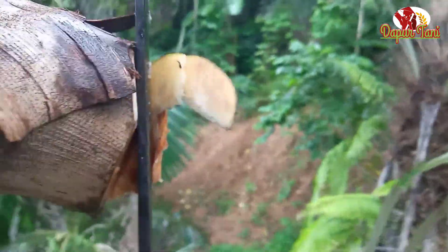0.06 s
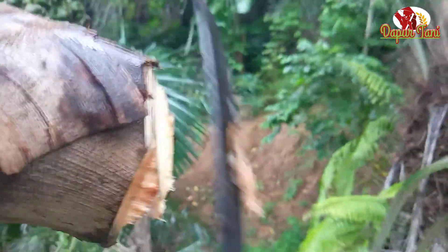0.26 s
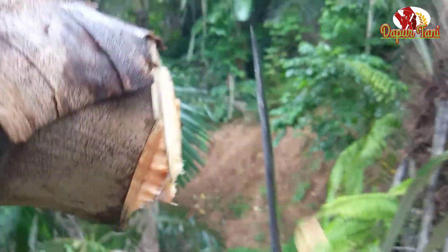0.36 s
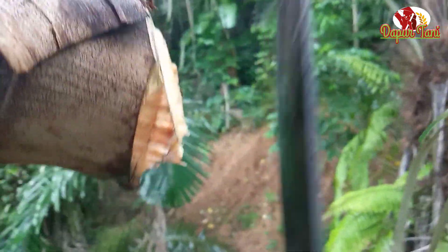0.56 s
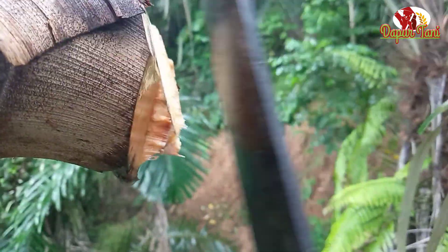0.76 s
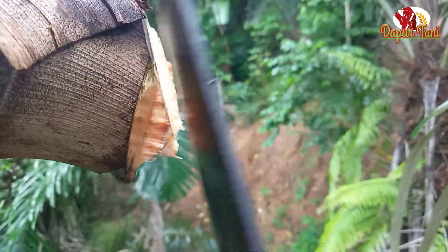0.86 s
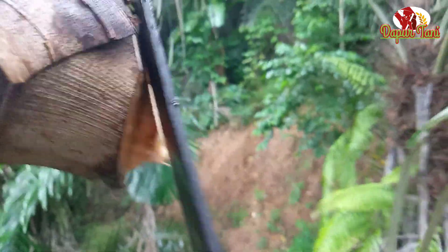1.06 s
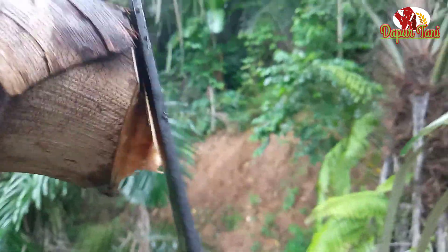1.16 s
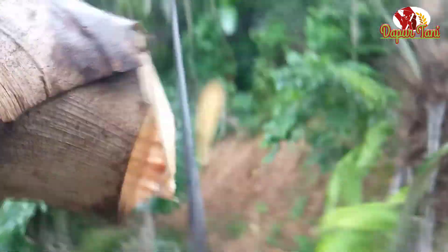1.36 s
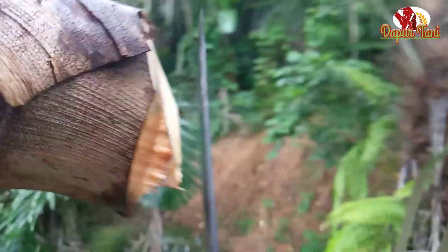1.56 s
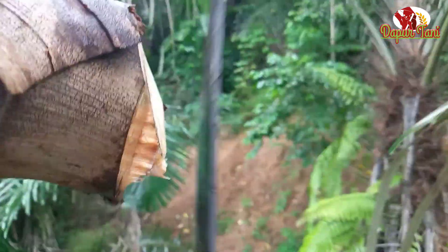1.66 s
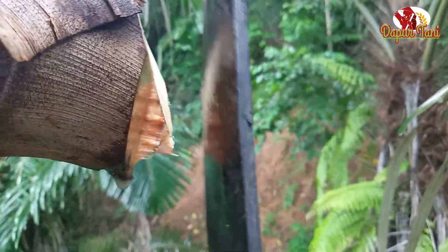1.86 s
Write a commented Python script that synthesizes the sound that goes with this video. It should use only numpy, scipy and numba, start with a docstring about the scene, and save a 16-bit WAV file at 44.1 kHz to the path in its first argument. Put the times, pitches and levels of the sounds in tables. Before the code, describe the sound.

A machete chops a thick fibrous stalk: a quick double crunch with a dull woody knock, sparse fibre ticks, then a rapid burst of wet tearing cuts and a final light tap, close up in quiet forest.

```python
"""A machete pares shavings off the cut end of a palm stalk, over steady forest rush, low drone and leaf ticks.
After one faint fibre tick, two short strokes crunch at 0.23 s and the stalk knocks; sparse ticks follow.
From 1.03 s seven strokes tear wet fibres, the stalk knocks again early on, and the steel rings faintly.
At 1.59 s the blade touches lightly. Noisy click trains drive the modes; filtered noise makes the forest."""
import sys
import numpy as np
from scipy import signal
from scipy.fft import rfft, irfft
from scipy.io import wavfile
from scipy.ndimage import uniform_filter1d
from numba import njit

SR = 44100
rng = np.random.default_rng(int(sys.argv[2]) if len(sys.argv) > 2 else 0)


def store_wav(level_fs):
    """Save 16-bit WAV to argv[1]."""
    pcm = np.round(np.clip(np.atleast_2d(level_fs), -1, 1) * 32767)
    wavfile.write(sys.argv[1], SR, pcm.T.astype(np.int16))


N = 83790


def undb(db):
    """Decibels to amplitude gain."""
    return 10 ** (np.asarray(db) / 20)


def unit(x):
    """Scale to standard deviation 1."""
    return x / (np.std(x) + 1e-12)


def clock():
    """Time of every sample, s."""
    return np.arange(N) / SR


def walk(rate_hz):
    """Random wander of spread 1: noise smoothed twice by a moving mean."""
    size = max(int(SR / rate_hz), 1)
    smooth = uniform_filter1d(rng.standard_normal(N), size)
    return unit(uniform_filter1d(smooth, size))


def through(x, response):
    """Convolve a force with an impulse response."""
    return signal.fftconvolve(x, response)[:N]


def highpass(x, cut_hz):
    """Second-order Butterworth high-pass."""
    return signal.sosfilt(signal.butter(2, cut_hz, "high", fs=SR, output="sos"), x)


def colour(points):
    """Minimum-phase impulse response of unit energy with spectrum (f/Hz, level/dB)."""
    hz, db = np.array(points, float).T
    size = 8192
    grid_hz = np.maximum(np.arange(size // 2 + 1) * SR / size, 1)
    gain = undb(np.interp(np.log(grid_hz), np.log(hz), db))
    cepstrum = irfft(np.log(gain))
    # fold the cepstrum to make the response causal
    cepstrum[1:size // 2] *= 2
    cepstrum[size // 2 + 1:] = 0
    response = irfft(np.exp(rfft(cepstrum)))
    return response / np.linalg.norm(response)


def ring(modes, wave=np.sin):
    """Impulse response: sum of exponentially decaying modes (f/Hz, t60/s, level/dB)."""
    t = clock()[:N // 2]
    response = np.zeros(len(t))
    for hz, t60_s, db in modes:
        decay = np.exp(-np.log(1000) * t / t60_s)
        response += undb(db) * wave(2 * np.pi * hz * t) * decay
    return response


def resonate(x, modes, wave=np.sin):
    """Drive modes whose joint response has unit energy."""
    response = ring(modes, wave)
    return through(x, response / np.linalg.norm(response))


def push(start_s, length_s):
    """Contact force: a half-sine of unit area."""
    phase = np.clip((clock() - start_s) / max(length_s, 4 / SR), 0, 1)
    force = np.sin(np.pi * phase)
    return force / force.sum()


@njit
def sweep(x, hz, q):
    """State-variable band-pass with a moving centre, gain 1 there."""
    y, band, low = np.empty(len(x)), 0., 0.
    for i in range(len(x)):
        g = np.tan(np.pi * hz[i] / SR)
        v = (band + g * (x[i] + 1e-18 - low)) / (1 + g * (g + 1 / q))
        band, low, y[i] = 2 * v - band, low + 2 * g * v, v / q
    return y


FIBRE_JITTER_LOG, FIBRE_SCATTER_DB = .26, 3.5


def fibres(rate_hz):
    """One click per fibre the edge crosses, uneven in spacing and strength."""
    chance = rng.standard_normal((N // 8, 2))
    places = np.cumsum(np.exp(FIBRE_JITTER_LOG * chance[:, 0]))
    at = np.interp(places, np.cumsum(rate_hz) / SR, np.arange(N)).astype(int)
    clicks = np.bincount(at, undb(FIBRE_SCATTER_DB * chance[:, 1]), N)
    clicks[-1] = 0  # surplus fibres pile up here
    clicks = clicks / np.sqrt(rate_hz)  # equal power at any rate
    return unit(highpass(clicks, 100))


# strokes of the edge: t/s, length/s, level/dB, swell over the stroke/dB, chatter f/Hz at start,
# chatter f/Hz at end, sizzle level/dB, steel level/dB (both re crunch)
STROKES = [(0.2343, 0.015, -29.5, 5, 2305, 3170, -26, -29),
           (0.2564, .0170, -36, 17, 1400, 1700, -23.5, -44),
           (1.031, 0.036, -32, 2.5, 1450, 1650, -16.5, -21.5),
           (1.0685, 0.0071, -22, -7, 1493, 2500, -23, -30),
           (1.2007, 0.037, -26, -2.5, 1501, 1350, -28.5, -43),
           (1.259, 0.022, -24, 7.5, 1656, 884, -27.5, -36), (1.2824, .0160, -30, -5, 900, 1500, -24.5, -42),
           (1.3250, 0.027, -23, 5, 2297, 1050, -26, -38), (1.3502, 0.02, -18.5, 5, 1080, 2790, -25.5, -36)]
STROKE_ATTACK_S, STROKE_RELEASE_S = 0.0032, 0.0035
GRIP_DB, GRIP_HZ = 1.5, 240  # spread and smoothing rate of the effort
SHAVING_DB, SHAVING_Q = 2, 1.57


def strokes():
    """The edge chatters over fibres; the shaving resonates at the chatter rate."""
    t = clock()
    tear, sizzle_drive, steel_drive, drag = np.zeros((4, N))
    for start_s, length_s, db, swell_db, first_hz, last_hz, sizzle_db, steel_db in STROKES:
        along = np.clip((t - start_s) / length_s, 0, 1)
        attack = np.clip((t - start_s) / STROKE_ATTACK_S, 0, 1)
        release = np.exp(-np.maximum(t - start_s - length_s, 0) / STROKE_RELEASE_S)
        effort_db = db + swell_db * (along - .5) + GRIP_DB * walk(GRIP_HZ)
        effort = attack * release * undb(effort_db)
        chatter_hz = first_hz * (last_hz / first_hz) ** along
        crunch = effort * fibres(chatter_hz)
        shaving = undb(SHAVING_DB) * sweep(crunch, chatter_hz, SHAVING_Q)
        tear += (crunch + shaving) / np.sqrt(2)
        sizzle_drive += undb(sizzle_db) * crunch
        steel_drive += undb(steel_db) * crunch
        drag += effort
    return tear, sizzle_drive, steel_drive, drag


# single fibres snapping: t/s, level/dB, sizzle level/dB (re snap)
SNAPS = [(.1025, -37, -13), (0.2465, -15, -20.5), (0.2705, -16.5, -38), (0.754, -32, -29),
         (.8060, -22.5, -36), (0.9409, -29, -24), (0.956, -28, -40), (1.028, -33.5, -16), (1.0354, -33, -5),
         (1.0400, -20, -8.5), (1.0460, -24, -10), (1.0520, -18, -26), (1.0757, -12, -24),
         (1.2154, -19.5, -34), (1.2726, -19.5, -35), (1.2807, -16.5, -34), (1.336, -18, -34),
         (1.3675, -14, -15.5), (1.5918, -24, -28)]
SNAP_DECAY_S = 0.0014


def snaps():
    """Each snapping fibre is a noise burst with exponential decay."""
    t = clock()
    tear, sizzle_drive = np.zeros((2, N))
    for start_s, db, sizzle_db in SNAPS:
        decay = (t >= start_s) * np.exp(-np.abs(t - start_s) / SNAP_DECAY_S)
        burst = undb(db) * decay * rng.standard_normal(N)
        tear += burst
        sizzle_drive += undb(sizzle_db) * burst
    return tear, sizzle_drive


# spectrum the tearing fibres sound through: f/Hz, level/dB
PULP = [(60, -33), (130, 1.5), (300, 5), (640, 5), (900, -2.5), (1250, -3.5), (2100, -1), (2800, -6.5),
        (3600, -7.5), (4400, -22), (5500, -47), (9000, -34.5), (16000, -85)]
# resonances of the pulp: f/Hz, t60/s, level/dB
PULP_MODES = [(645, 0.12, -2), (844, 0.088, -0.5), (1152.4, 0.061, 10), (1266, 0.041, 7.5),
              (1347, .06, -16), (1482, 0.071, -0.5), (1582, 0.21, -15), (1920, 0.18, -22),
              (2065, 0.043, 1.5), (2470, 0.099, -25), (3080, 0.057, -1.5)]
PULP_DB, PULP_RING_DB = -2, -13.5  # overall; resonances re direct tear


def pulp(tear):
    """Wet pulp rings with the tear and colours it."""
    ringing = undb(PULP_RING_DB) * resonate(tear, PULP_MODES, np.cos)
    return undb(PULP_DB) * through(tear + ringing, colour(PULP))


# spectrum of the wet sizzle at the edge: f/Hz, level/dB
SIZZLE = [(1500, -18), (4000, 1), (5000, 2), (5700, -4), (6800, -2), (8500, 1), (10000, -6), (11300, -9),
          (12400, -19), (14000, -13), (15300, -8)]


def sizzle(drive):
    """Wet sizzle: crunch and snaps through a treble spectrum."""
    return through(drive, colour(SIZZLE))


# modes of the blade: f/Hz, t60/s, level/dB
STEEL = [(4900, .07, -11), (6380, 0.074, 3), (8400, .08, 3), (9610, 0.053, -2), (14340, .05, -14)]


def steel(drive):
    """The crunch excites the decaying modes of the blade."""
    return resonate(drive, STEEL)


# shudder spectrum of the stalk: f/Hz, level/dB
SHAKE = [(25, -16), (55, -15), (85, 1), (150, 0.5), (400, -4.5), (900, -51)]
SHAKE_DB = -30
SWAY_HZ, SWAY_T60_S, SWAY_DB = 56, .3, -39


def shudder(drag):
    """The dragging edge shakes the stalk with noise; its lowest mode sways on."""
    judder = drag / drag.max() * rng.standard_normal(N)
    shake = undb(SHAKE_DB) * through(judder, colour(SHAKE))
    sway = undb(SWAY_DB) * resonate(judder, [(SWAY_HZ, SWAY_T60_S, 0)])
    return shake + sway


def cutting():
    """Strokes and snaps drive pulp and sizzle; strokes also drive steel and stalk."""
    tear, sizzle_drive, steel_drive, drag = strokes()
    snap_tear, snap_sizzle = snaps()
    edge = pulp(tear + snap_tear) + sizzle(sizzle_drive + snap_sizzle)
    return edge + steel(steel_drive) + shudder(drag)


# knocks: t/s, level/dB, contact/s, place (0 = rim, 1 = cut face), damping by the resting blade/(dB/s)
KNOCKS = [(0.2467, -13.5, 0.0022, 0, 1100), (0.269, -2, 0.001, 0.072, 13),
          (.9400, -21.5, 0.00069, 0.83, 505), (1.0780, -3.5, .0012, 0.93, 332),
          (1.0974, -18.5, 0.0018, 1, 900)]
# modes of the stalk: f/Hz, t60/s, level/dB struck at the rim, level/dB struck on the face
STALK = [(57.7, 0.58, -26, -37), (147.4, 0.096, -8.5, -21), (211, 0.036, -16, 1), (332, 0.055, -5.5, -9.5),
         (448, 0.066, -15, -11.5), (625, 0.066, -51, -6)]
DISPERSION_HZ = 440  # below this the jolt travels slowly along the stalk


def knocks():
    """The blade jolts the stalk; place sets the mode mix, the resting blade damps it."""
    t = clock()[:N // 2]
    jolts = np.zeros(N)
    for start_s, db, contact_s, place, damping_db_per_s in KNOCKS:
        modes = [(hz, t60_s, rim_db + place * (face_db - rim_db))
                 for hz, t60_s, rim_db, face_db in STALK]
        response = ring(modes, np.cos) * undb(-damping_db_per_s * t)
        jolts += undb(db) * through(push(start_s, contact_s), response)
    # first-order all-pass: delays the lows most
    lag = np.tan(np.pi * DISPERSION_HZ / SR)
    return signal.lfilter([lag - 1, lag + 1], [lag + 1, lag - 1], jolts)


# light touches of the blade: t/s, level/dB
TOUCHES = [(1.5925, -30.5)]
# modes the touch rings: f/Hz, t60/s, level/dB
CLINK = [(2070, 0.05, -6), (2910, 0.011, 5.5), (3150, 0.026, -3), (4290, 0.021, -2.5), (4380, 0.016, -18),
         (8300, 0.012, -16)]
TOUCH_CONTACT_S = .0001


def clink():
    """A light touch as the blade is drawn back: a brief push rings the modes."""
    force = sum(undb(db) * push(start_s, TOUCH_CONTACT_S) for start_s, db in TOUCHES)
    return through(force, ring(CLINK))


# spectrum of the forest: f/Hz, level per Hz/dB
FOREST = [(20, -14), (35, -33), (55, -22), (95, -12), (140, -5), (200, -9.5), (290, -5), (400, -6.5),
          (600, -8), (800, -8.5), (1000, -11.5), (1700, -9.5), (2300, -14), (3000, -21.5), (4000, -28),
          (4700, -39), (5500, -51.5), (6900, -49), (8500, -52), (10000, -63), (15500, -63)]
FOREST_DB, FOREST_WAVER_DB, FOREST_WAVER_HZ = -38, 1, 4.1


def rush():
    """Steady distant rush: coloured noise with a slight waver in level."""
    noise = unit(through(rng.standard_normal(N), colour(FOREST)))
    return undb(FOREST_DB + FOREST_WAVER_DB * walk(FOREST_WAVER_HZ)) * noise


# level of the low drone: t/s, level/dB
DRONE = [(0, -45.5), (.5, -48), (.7, -43), (.9, -45), (1.4, -47), (1.9, -51)]
DRONE_HZ, DRONE_WIDTH_HZ = 180, 13


def drone():
    """Low wavering drone: noise in one narrow resonance."""
    hz = np.arange(N // 2 + 1) * SR / N
    resonance = 1 / (1 + ((hz - DRONE_HZ) / DRONE_WIDTH_HZ) ** 2)
    hum = unit(irfft(rfft(rng.standard_normal(N)) * resonance, N))
    times_s, levels_db = np.array(DRONE).T
    return hum * undb(np.interp(clock(), times_s, levels_db))


# spectrum of the leaf ticks: f/Hz, level/dB
LEAF = [(1000, -8), (3000, 0.5), (5000, -5), (8000, -11), (11000, -26), (16000, -30)]
LEAF_TICKS_PER_S, LEAF_DB, LEAF_SCATTER_DB = 30, -73, 3.5


def leaves():
    """Tiny leaf ticks: random impulses of uneven strength, coloured."""
    hits = rng.random(N) < LEAF_TICKS_PER_S / SR
    ticks = hits * undb(LEAF_SCATTER_DB * rng.standard_normal(N))
    return undb(LEAF_DB) * unit(through(ticks, colour(LEAF)))


def scene():
    """Blade and stalk in front of the forest."""
    return (cutting() + knocks() + clink() + rush() + drone() + leaves())[None]


LOW_CUT_HZ, TOP_HZ = 30, 15550


def record(dry):
    """High-pass drops the deepest bass; steep elliptic low-pass cuts the top treble."""
    wet = highpass(dry, LOW_CUT_HZ)
    return signal.sosfilt(signal.ellip(10, .2, 80, TOP_HZ, fs=SR, output="sos"), wet)


dry = scene()
out = record(dry)
store_wav(out)
```